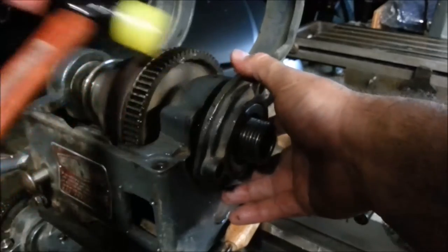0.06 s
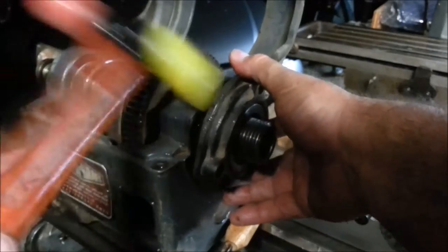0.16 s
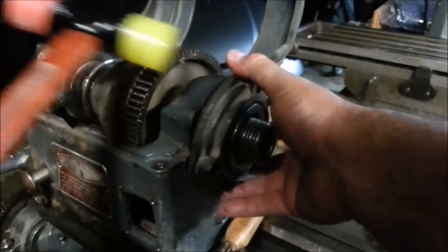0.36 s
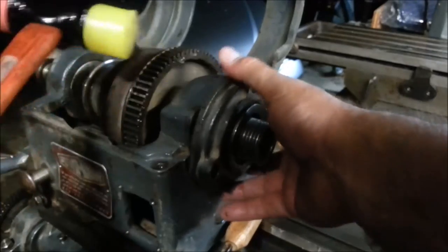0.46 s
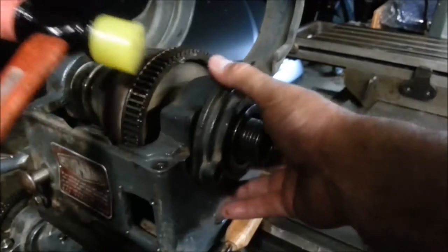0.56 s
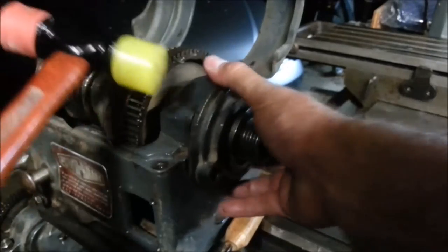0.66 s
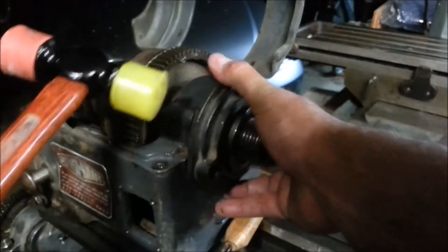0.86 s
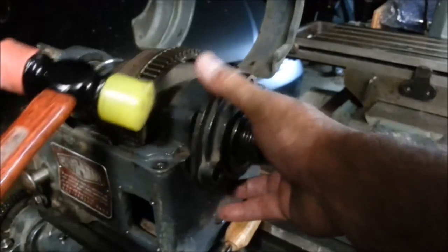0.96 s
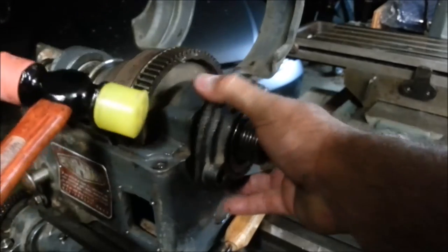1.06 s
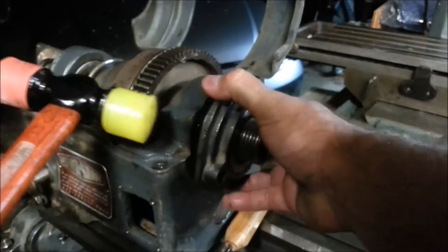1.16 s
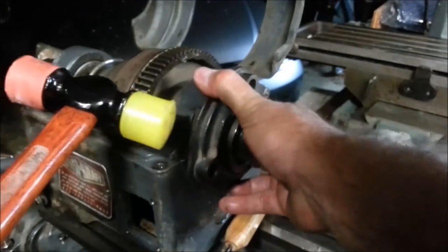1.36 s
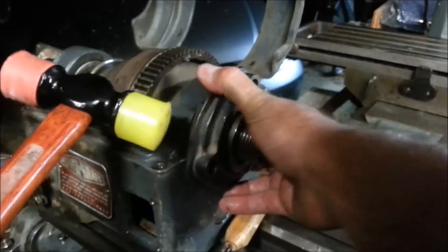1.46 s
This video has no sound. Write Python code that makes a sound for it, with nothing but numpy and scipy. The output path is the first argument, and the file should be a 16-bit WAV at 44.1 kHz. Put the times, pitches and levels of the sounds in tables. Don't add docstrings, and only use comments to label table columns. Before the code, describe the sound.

Mallet knocks on a steel spindle in a heavy lathe housing. An earlier knock dies away at the start; at 0.23 s one hard, bright clank lands with a low thud, washer jingle and brief crackling rattle. Lighter taps follow at 0.68 and 0.92, a loose rattle around 1.1-1.16, small creaks and a dull tap near 1.35. Close microphone, short workshop echo, quiet hum, faint rapid ticking left.

```python
import sys
import numpy as np
from scipy import signal
from scipy.fft import rfft, irfft
from scipy.io import wavfile

SR = 44100
rng = np.random.default_rng(int(sys.argv[2]) if len(sys.argv) > 2 else 0)


def wrap_up_sound(samples):
    columns = np.atleast_2d(samples).T
    tamed = np.clip(columns, -1, 1)
    steps = np.round(tamed * 32767).astype(np.int16)
    wavfile.write(sys.argv[1], SR, steps)


def magnitude_from_level(level_db):
    exponent = np.asarray(level_db, float) / 20
    return 10 ** exponent


N = 66150
PAD = 4410
TIME = (np.arange(N + PAD) - PAD) / SR


def butter(x, order, hz, kind="low"):
    return signal.sosfilt(signal.butter(order, hz, kind, fs=SR, output="sos"), x)


def at_hz(points, hz):
    points = np.array(points)
    return np.interp(np.log(hz), np.log(points[:, 0]), points[:, 1])


def strike(modes, start_s, db, favour_hz=1000, db_per_oct=0):
    chatter_s, spread_db = .0012, 4.5
    out = np.zeros(N + PAD)
    luck = rng.standard_normal((len(start_s), 2, 14))
    for k, (hz, level_db, t60) in enumerate(modes):
        late = chatter_s * np.abs(luck[:, 1, k])
        when = ((start_s + late) * SR).astype(int) + PAD
        away_db = db_per_oct * np.abs(np.log2(hz / favour_hz))
        clicks = np.full(N + PAD, 1e-18)
        clicks[when] = magnitude_from_level(db + level_db - away_db + spread_db * luck[:, 0, k]) * (-1) ** k
        r = magnitude_from_level(-60 / (t60 * SR))
        w = 2 * np.pi * hz / SR
        out += signal.lfilter([0, np.sin(w)], [1, -2 * r * np.cos(w), r * r], clicks)
    return out


def bands(size, gain, alike):
    out = 0
    edges = 22 * 2 ** np.arange(0, 9.8, .5)
    white = rng.standard_normal((2, 2, size))
    for k, (low, high) in enumerate(zip(edges, edges[1:])):
        mid, side = butter(white[k % 2], 2, [low, high], "band")
        hz = np.sqrt(low * high)
        c = np.clip(alike(hz), -1, 1)
        out = out + gain(hz) * (np.sqrt(1 + c) * mid + np.sqrt(1 - c) * side * [[1], [-1]])
    return out / np.sqrt(np.mean(out ** 2) + 1e-20)


# start in seconds, spindle ring in dB, mallet knock in dB,
# washer jingle in dB, favoured knock region in Hz.
CONTACTS = [(-.03, -22.5, -17, -54, 2000), (.043, -40, -44.5, -81.5, 1960), (0.201, -48.5, -48, -51, 2000),
            (0.2291, 2.5, -21, -11, 2530), (.628, -51.5, -51, -41.5, 2000),
            (0.6803, -34.5, -25.5, -60, 1850), (.9165, -73, -38.5, -61.5, 1110),
            (1.095, -41, -39, -35.5, 1700), (1.107, -61, -69, -42, 2000), (1.117, -63, -58, -47.5, 2000),
            (1.124, -50, -56, -45.5, 2000), (1.13, -46.5, -55, -67, 2000), (1.1495, -44, -33.5, -48, 1720),
            (1.159, -45, -40, -69, 2000), (1.327, -40.5, -41, -80, 4000), (1.3463, -45.5, -24, -82, 2480)]
# pitch in Hz, level in dB, t60 in seconds.
SPINDLE_MODES = [(1585, -23.5, 0.088), (2300, -17.5, .08), (2453, -33.5, .08), (2490, -7.5, .1),
                 (2846, -21, 0.13), (3030, -18.5, 0.15), (3090, -21, .1), (3480, -45, .2),
                 (3397, -22, 0.14), (3569, -31, .2), (4160, -36.5, 0.038), (4183, -30, 0.48),
                 (5000, -37.5, 0.057), (5940, -20, .13)]
KNOCK_MODES = [(800, -4, 0.024), (1054, -4, 0.054), (1350, -1, 0.024), (1512, -8, 0.057),
               (1704, -0.5, 0.021), (1992, -1, 0.023), (2200, -8.5, 0.018), (2726, -1, .05),
               (4000, -9.5, 0.028)]
WASHER_MODES = [(7400, -11, 0.035), (8050, -4, .04), (7500, -8, 0.038), (9000, -17, .02),
                (10600, -11.5, 0.079), (11010, -19.5, .05), (11080, -12, 0.023), (12350, -4, .07),
                (12750, -29.5, .04), (13700, -8.5, .04), (15600, -13.5, .04)]


def metal():
    start_s, ring_db, knock_db, jingle_db, knock_hz = np.transpose(CONTACTS)
    main_hz, sag_hz, cap_db, main_t60_s = 2553, 60, -5, 0.11
    main = 0
    for start, db in zip(start_s, ring_db):
        begun = TIME >= start
        swing = begun * magnitude_from_level(db - 60 * np.maximum(TIME - start, 0) / main_t60_s)
        turns = np.cumsum((main_hz - sag_hz * swing) * begun) / SR
        main = main + np.minimum(swing, magnitude_from_level(cap_db)) * np.sin(2 * np.pi * turns)
    spindle = strike(SPINDLE_MODES, start_s, ring_db - 3)
    knock = strike(KNOCK_MODES, start_s, knock_db - 2, knock_hz, db_per_oct=10.5)
    washer = strike(WASHER_MODES, start_s, jingle_db - 6)
    return main + spindle + knock + washer


# start in seconds, level in dB, favoured pitch region in Hz.
PUSHES = [(-.004, -24, 605), (0.203, -33.5, 450), (.2255, -19.5, 623), (.245, -21, 434), (.258, -21, 630),
          (.631, -39.5, 428), (.682, -35, 477), (0.916, -43, 423), (1.098, -28, 450), (1.128, -36.5, 450),
          (1.149, -22.5, 565), (1.161, -36.5, 337), (1.214, -45.5, 340), (1.246, -43, 400),
          (1.347, -33, 688)]
# pitch in Hz, level in dB, t60 in seconds.
CASTING_MODES = [(294, -0.5, .08), (329, -3.5, 0.096), (355.3, -1.5, 0.11), (400, -6, 0.11),
                 (450, -4.5, 0.095), (490.2, -6, 0.043), (600.9, -9, 0.13), (649.7, -8.5, 0.042),
                 (716, -7, 0.054), (767, -9.5, 0.14), (822, -5.5, 0.056), (939, -9, 0.046), (1077, -7, 0.1)]


def casting():
    start_s, db, favour_hz = np.transpose(PUSHES)
    return butter(strike(CASTING_MODES, start_s, db, favour_hz, db_per_oct=15.5), 2, 1500)


# start in seconds, level in dB, hold in seconds, t60 in seconds.
BURSTS = [
    (-.04, -33.5, 0.014, 0.051),
    (0.2231, -50.5, .003, 0.011),
    (0.2252, -19.5, 0.009, 0.0081),
    (0.2272, -18, 0.013, .03),
    (.627, -57.5, 0.0034, 0.026),
    (1.098, -42, 0.0019, 0.02),
    (1.141, -44.5, 0.0043, 0.029),
]
# frequency in Hz, level in dB per Hz.
CRACKLE_COLOUR = [(300, -1.5), (1000, -10), (2500, 1), (4200, -0.5), (6000, -3.5), (8000, -8.5),
                  (12500, -17.5), (15000, -18.5)]


def crackle():
    env = 0
    for start, db, hold, t60 in BURSTS:
        fall_db = 60 * np.maximum(TIME - start - hold, 0) / t60
        env = env + (TIME >= start) * magnitude_from_level(db - fall_db)
    return env * bands(N + PAD, lambda hz: magnitude_from_level(at_hz(CRACKLE_COLOUR, hz)), lambda hz: 1)[0]


# start in seconds, length in seconds, level in dB.
SEAT_CREAKS = [
    (1.105, 0.0245, -34),
    (1.285, 0.036, -38.5),
    (1.326, 0.022, -30.5),
]


def creaks():
    creak_hz, release_s = 449.7, 0.0021
    out = 0
    for start, length, db in SEAT_CREAKS:
        rise = np.clip((TIME - start) / length, 0, 1)
        swell = rise * np.exp(-np.maximum(TIME - start - length, 0) / release_s)
        out = out + magnitude_from_level(db) * np.sqrt(swell) * np.sin(2 * np.pi * creak_hz * (TIME - start))
    return out


# frequency in Hz, t60 in seconds.
ECHO_DECAY = [(150, .25), (500, 0.25), (2000, 0.25), (4000, 0.28), (6500, 0.05), (14000, 0.054)]


def workshop(x):
    delay_s = .004
    t = np.arange(SR // 2) / SR
    echo = bands(len(t), lambda hz: magnitude_from_level(-60 * t / at_hz(ECHO_DECAY, hz)), lambda hz: .2)
    echo = np.pad(echo, ((0, 0), (int(delay_s * SR), 0))) / np.sqrt(len(t))
    return signal.fftconvolve(x[None], echo, axes=1)[:, :len(x)]


# frequency in Hz, level in dB per Hz.
HUM_COLOUR = [(25, -8.5), (120, -2.5), (330, 2), (700, -6.5), (1500, -11), (3400, -14), (6000, -21),
              (13500, -21)]
# frequency in Hz, left-right likeness from -1 to 1.
HUM_LIKENESS = [(30, -.4), (130, -.2), (500, 0.38), (1500, 0.023), (12000, 0)]


def hum():
    noise = bands(N + PAD, lambda hz: magnitude_from_level(at_hz(HUM_COLOUR, hz)), lambda hz: at_hz(HUM_LIKENESS, hz))
    return signal.sosfilt(signal.cheby2(8, 40, 14900, fs=SR, output="sos"), magnitude_from_level(-55.5) * noise)


def ticks():
    first_s, period_s, rise_s, drop_s = .0187, .03329, .0004, .00136
    low_hz, high_hz = 132, 450
    phase = (np.arange(N) / SR - first_s) % period_s
    rise = phase < rise_s
    drop = ~rise & (phase < rise_s + drop_s)
    pulse = butter(magnitude_from_level(4) * rise - drop, 1, [low_hz, high_hz], "band")
    pulse = butter(pulse, 1, low_hz, "high")
    return magnitude_from_level(-35.5) * pulse * [[1], [-0.015]]


def scene():
    left_lag_s, pan_db, low_pan_db = .00009, 0.37, 2.6
    thud, creak, ring, crack = casting(), creaks(), metal(), crackle()
    low, high = thud + creak, ring + crack
    left = low * magnitude_from_level(low_pan_db) + high * magnitude_from_level(pan_db)
    right = low * magnitude_from_level(-low_pan_db) + high * magnitude_from_level(-pan_db)
    hz = np.arange(len(left) // 2 + 1) * SR / len(left)
    left = irfft(rfft(left) * np.exp(-2j * np.pi * hz * left_lag_s), len(left))
    wet = workshop(magnitude_from_level(-6.5) * thud + magnitude_from_level(-11) * creak + magnitude_from_level(-18.5) * ring + magnitude_from_level(-8) * crack)
    heard = butter(np.array([left, right]) + wet, 3, 240, "high")
    return (heard + hum())[:, PAD:] + ticks()


def low_pass(x):
    return signal.sosfilt(signal.butter(12, 15680, fs=SR, output="sos"), x)


def record(dry):
    mix = signal.sosfilt(signal.cheby2(10, 60, 15800, fs=SR, output="sos"), np.tanh(dry))
    return low_pass(mix)


dry = scene()
out = record(dry)
wrap_up_sound(out)
```